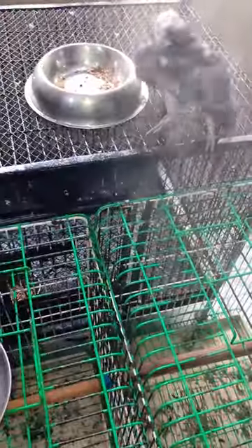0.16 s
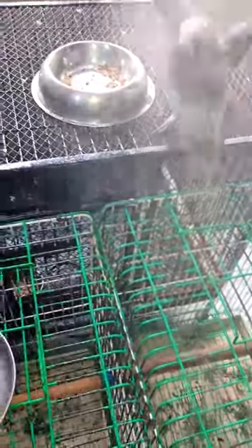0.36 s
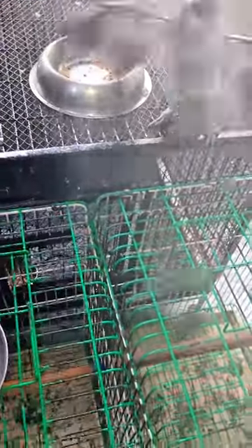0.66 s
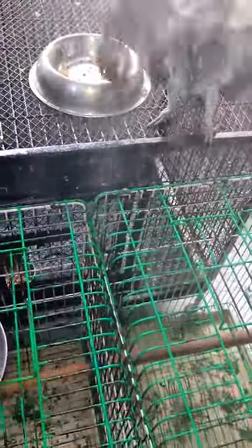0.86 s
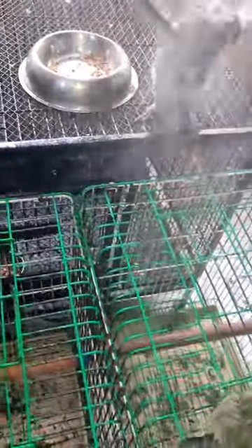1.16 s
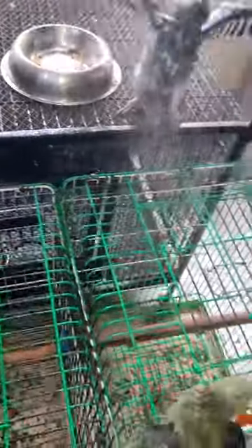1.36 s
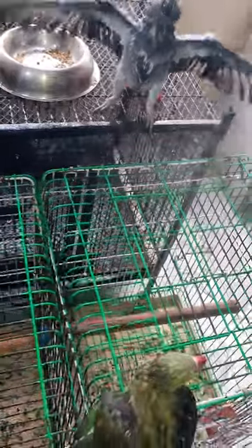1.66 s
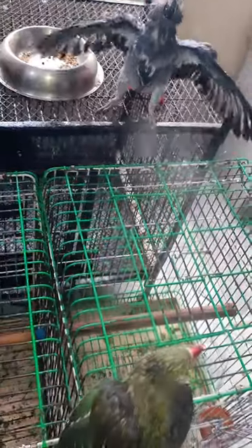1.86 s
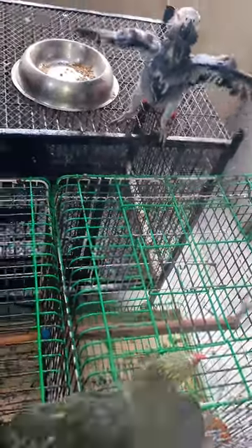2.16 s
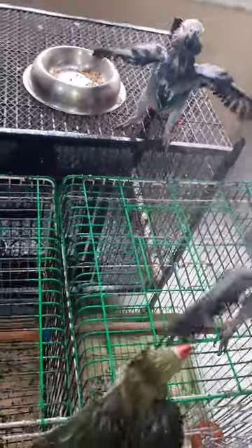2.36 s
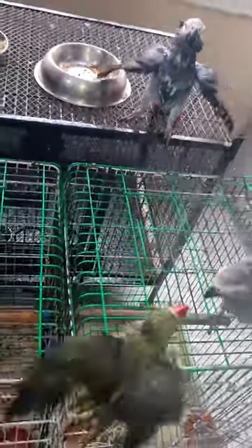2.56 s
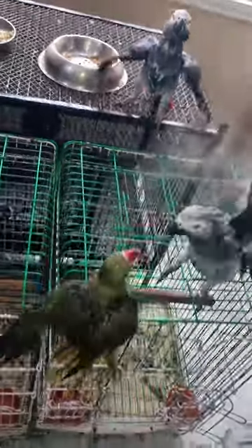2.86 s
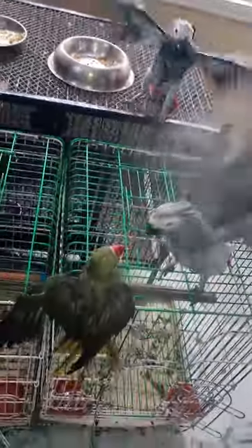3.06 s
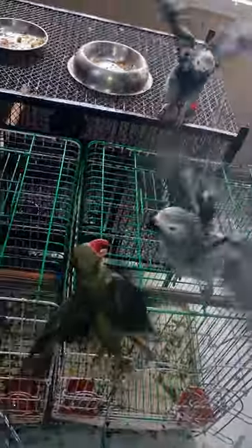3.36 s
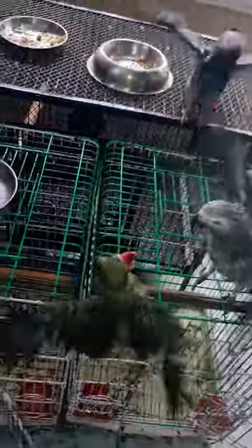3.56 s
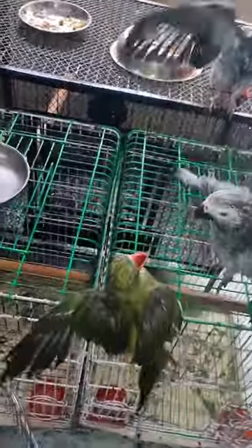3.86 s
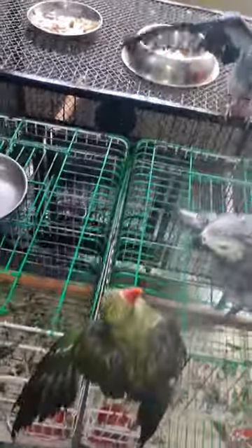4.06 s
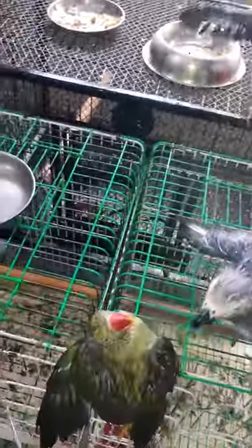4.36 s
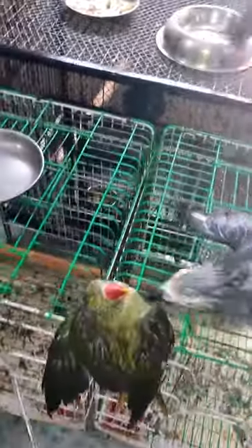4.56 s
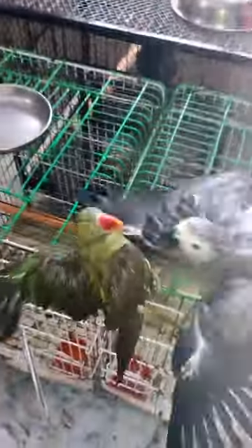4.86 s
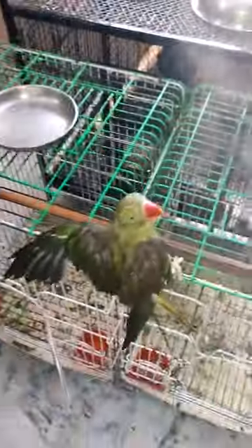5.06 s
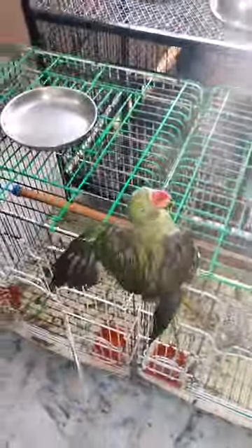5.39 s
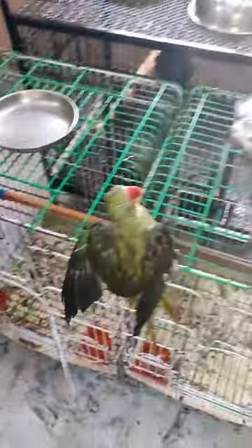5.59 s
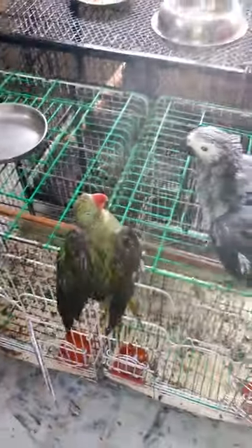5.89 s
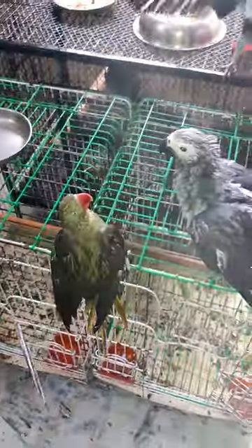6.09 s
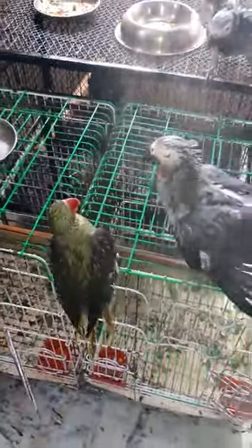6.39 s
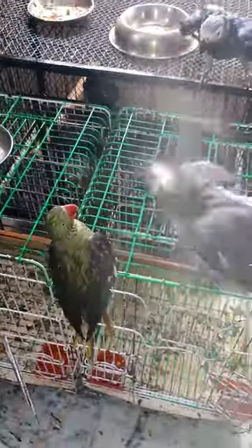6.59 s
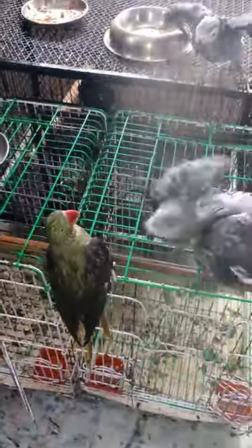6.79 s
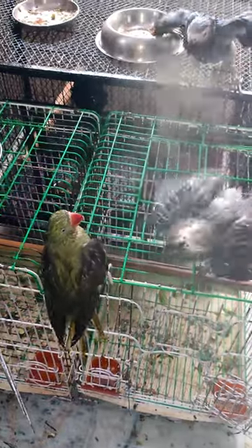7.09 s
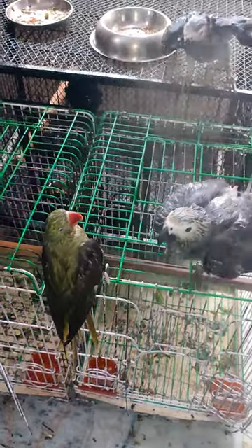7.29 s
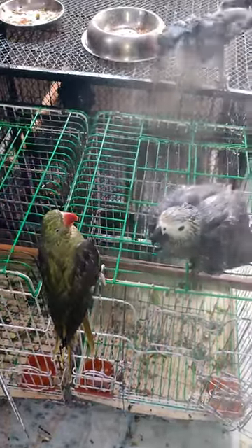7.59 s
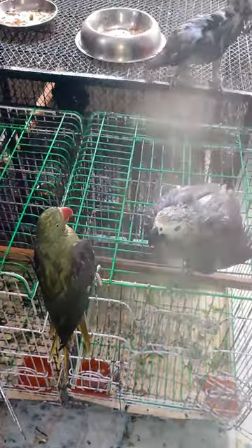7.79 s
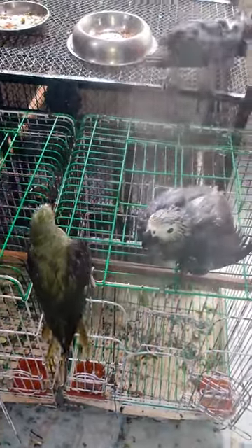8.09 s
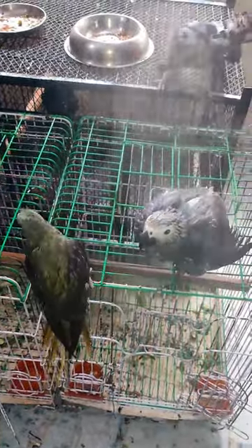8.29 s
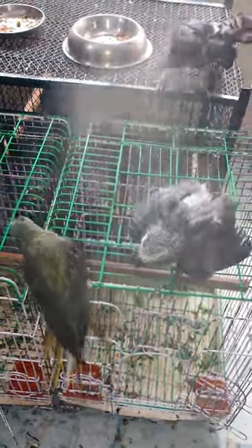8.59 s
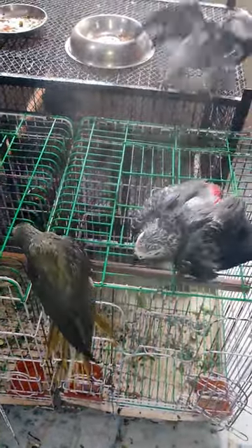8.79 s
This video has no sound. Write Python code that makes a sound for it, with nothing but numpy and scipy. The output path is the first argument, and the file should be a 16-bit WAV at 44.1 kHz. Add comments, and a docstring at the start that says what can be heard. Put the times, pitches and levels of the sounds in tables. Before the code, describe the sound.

Small parrots chirp and screech in quick flurries in a hard-walled room, while a fine water spray hisses and patters. One bird beats its wings for the first few seconds. Bigger parrots give short, harsh squawks and soft grumbles close by, and claws now and then clink on cage wire. Past the middle come a run of high tweets and two dry knocks, then the calls thin out over a low hum.

```python
"""A hard-walled room, where caged parrots are showered with a fine water mist. Small parrots chirp and
screech all around, in short flurries over a steady bustle, and big ones squawk and grumble close by:
each call is a vibrating membrane whose harmonics are filtered by throat and beak. One bird beats its
wings over the mesh, pushing air and swishing feathers; claws set the wires ringing. The nozzle hisses,
droplets patter, and two dry knocks sound over a low rumble and hum."""
import sys
import numpy as np
from scipy import signal
from scipy.fft import rfft, irfft
from scipy.io import wavfile
from scipy.ndimage import uniform_filter1d

SR = 44100
rng = np.random.default_rng(int(sys.argv[2]) if len(sys.argv) > 2 else 0)


def to_wav(sig):
    """Store sig (one row per channel, or 1-D mono) as 16-bit WAV at the path in sys.argv[1].

    Samples outside -1..1 are clipped; the rate is SR.
    """
    pcm = np.clip(np.atleast_2d(sig), -1, 1) * 32767
    pcm = np.round(pcm).astype(np.int16)
    wavfile.write(sys.argv[1], SR, pcm.T)  # frames by channels


N = 394254
TIME = np.arange(N) / SR

# Levels are relative, ahead of room and channel gains. Roughness is 0 for a clear voice, near 1 if harsh.
# clear chirps: t/s, length/s, start f/Hz, end f/Hz, level/dB, roughness
CHIRPS = [(0, 0.011, 4780, 4880, -18, 0.23), (0.026, 0.067, 6450, 5100, -22.5, 0.3),
          (2.834, .11, 4690, 5250, -21.5, 0.21), (3.066, 0.028, 3650, 3390, -30.5, .1),
          (3.107, 0.04, 5020, 4646, -22, 0.16), (3.289, 0.017, 4080, 4090, -34, 0.1),
          (3.324, 0.035, 5040, 5180, -21, .22), (3.487, 0.015, 4200, 4060, -25, 0),
          (3.513, 0.0645, 4650, 4910, -22, 0.3), (3.567, .059, 3270, 3420, -23, 0.19),
          (4.015, 0.029, 3340, 3360, -29.5, 0.3), (4.613, 0.03, 4460, 5040, -23.5, 0.28),
          (6.055, 0.039, 4460, 4800, -29.5, 0.5), (6.682, 0.073, 2928, 2823, -35.5, 0.15),
          (7.313, 0.038, 3420, 3110, -31, 0.15), (7.759, 0.075, 2804, 3880, -28.5, 0.18),
          (7.945, 0.033, 3360, 2950, -25.5, 0.13), (8.051, 0.078, 4780, 5180, -36.5, 0.3),
          (8.59, 0.079, 4680, 5090, -34, 0.24)]
# screeches: t/s, length/s, start f/Hz, middle f/Hz, end f/Hz, beak f/Hz, lift/dB, level/dB, roughness
SCREECHES = [(0.273, 0.1, 2544, 2510, 2360, 5000, 25, -22, 0.7),
             (0.464, 0.069, 2260, 2380, 2310, 4320, 25, -28.5, 1.46),
             (0.632, 0.069, 2097, 2263, 2430, 4300, 36, -24.5, 1.03),
             (0.767, 0.081, 1376, 1408, 1413, 4230, 9, -32.5, 0.3),
             (0.891, 0.067, 1438, 1450, 1420, 5850, 15, -28.5, 0.3),
             (0.982, 0.1, 1403, 1385, 1340, 4200, 12, -32.5, 0.16),
             (1.12, 0.13, 2680, 2800, 2740, 5400, 6, -28, 0.37),
             (1.324, 0.061, 2218, 2105, 2004, 4170, 22, -23.5, 0.37),
             (1.397, 0.11, 1974, 1879, 2097, 3800, 25.5, -22, 0.4),
             (1.665, 0.16, 2293, 2467, 2446, 4870, 18, -29, 0.72),
             (1.787, 0.08, 2484, 2550, 2490, 5070, 16, -26, 0.7),
             (1.933, 0.094, 2527, 2630, 2563, 5150, 21, -27.5, 0.2),
             (2.333, 0.11, 2380, 2568, 2537, 4700, 18.5, -23.5, 0.55),
             (2.552, 0.11, 1877, 2106, 1920, 3900, 18, -28.5, 0),
             (2.724, 0.14, 1956, 2120, 1870, 6370, 24, -21.5, 0.2),
             (3.027, 0.11, 1920, 2184, 1950, 6300, 29, -30.5, 0.16),
             (3.67, 0.087, 1790, 2262, 2504, 4280, 26, -21, 0.5),
             (3.778, 0.062, 1650, 1972, 2155, 3700, 40, -19.5, 0.5),
             (3.899, 0.062, 1764, 2115, 2250, 4030, 37, -21.5, 0.49),
             (4.293, 0.033, 1780, 1943, 2100, 4020, 20, -31, 0.56),
             (4.512, 0.033, 2005, 1804, 1725, 1840, -1, -28.5, 0.18),
             (4.55, .11, 1876, 2066, 2050, 5840, 25, -26.5, 0.19),
             (5.553, 0.094, 2305, 2182, 2134, 6500, 20, -26, 0.39),
             (5.62, 0.033, 2720, 2650, 2550, 5440, 27, -20.5, 0.16),
             (6.302, 0.12, 1966, 2060, 2115, 2100, 8, -42.5, 0.5),
             (7.085, 0.081, 1846, 2130, 2305, 4600, 11, -28, 0.22),
             (7.139, 0.076, 2020, 2030, 1970, 6100, 28, -23, 0.06),
             (7.534, 0.054, 1780, 1964, 1720, 6000, -8, -34, 0.83),
             (7.853, 0.063, 1862, 2018, 2007, 3900, 14.5, -24, 0.37)]
# two-step tweets: t/s, high note f/Hz, low note level/dB, high note level/dB, octave level/dB, roughness
TWEETS = [(4.2, 5950, -41, -39.5, -65, 0.4), (4.313, 5540, -38, -36, -67, .3),
          (4.431, 5480, -25, -38, -65, 0.14), (4.786, 5480, -25, -31.5, -64, 0.08),
          (5.739, 5810, -20.5, -34, -30, 0.64), (5.842, 5680, -28.5, -34, -31.5, 0.3),
          (5.96, 5910, -25.5, -36, -31, 0), (6.08, 5820, -39, -35.5, -33, 0.3),
          (6.206, 5630, -27, -36, -35.5, 0.65), (6.317, 5490, -23, -27, -32.5, 0.54),
          (6.434, 5330, -31, -42, -38.5, 0.46), (6.556, 5440, -26, -33.5, -36.5, 0.43)]
# tiny pips close by: t/s, length/s, f/Hz, level/dB
PIPS = [(4.664, 0.011, 3650, -23), (4.7815, .015, 3376, -24.5), (7.7046, .004, 4700, -22),
        (7.705, .006, 10100, -36), (7.726, .004, 4600, -17)]
# squawks: t/s, length/s, start f/Hz, end f/Hz, throat start f/Hz, throat end f/Hz, level/dB, roughness
SQUAWKS = [(0.785, 0.067, 472, 516, 890, 1000, -34, 0.92), (0.946, 0.08, 529, 578, 1100, 1210, -36, 0.89),
           (1.205, 0.028, 640, 660, 2600, 2600, -25, 0.87), (1.224, 0.04, 625, 664, 2730, 2660, -15, 1.04),
           (1.263, .045, 642, 686, 2780, 2700, -22, 0.93), (2.274, 0.026, 895, 726, 1730, 1450, -28, 0.66),
           (2.404, 0.015, 928, 803, 1290, 1600, -25, 0.66),
           (3.203, 0.097, 556, 620, 1650, 2200, -29.5, 0.9), (3.3, 0.099, 605, 682, 1340, 1770, -27, 0.77),
           (3.359, 0.04, 986, 726, 1010, 1400, -31.5, 0.45),
           (3.388, 0.042, 783, 1006, 1650, 2030, -14, 0.65), (3.42, 0.029, 903, 933, 2100, 2730, -15, 0.78),
           (3.463, 0.046, 874, 878, 2160, 2540, -25, 0.79), (4.833, 0.045, 699, 960, 970, 1220, -24, 0.77),
           (4.862, 0.045, 940, 1192, 1060, 1390, -25, 0.6),
           (4.871, 0.05, 572.4, 595, 1710, 2010, -19, 0.56),
           (4.885, 0.042, 555.5, 646, 3040, 3700, -19, 0.5),
           (4.925, 0.029, 598, 613, 2200, 2500, -23, 0.46), (5.094, 0.036, 804, 885, 1080, 1220, -26, 0.42),
           (5.14, 0.014, 889, 901, 1800, 1840, -20.5, 0.48),
           (5.163, 0.0064, 862, 826, 1770, 1970, -26, 0.8),
           (5.426, 0.028, 583, 611, 2410, 2570, -20.5, 0.68),
           (5.523, 0.031, 601, 617, 2550, 2500, -22, 0.54), (5.827, 0.063, 663, 438, 2550, 2420, -27, 0.87)]
# soft grumbles: t/s, length/s, start f/Hz, middle f/Hz, end f/Hz, level/dB
GRUMBLES = [(3.286, .085, 720, 590, 700, -36), (4.452, .042, 392, 386, 382, -46),
            (4.608, .118, 382, 446, 500, -41), (5.822, .112, 700, 535, 368, -41),
            (7.564, .112, 700, 510, 345, -41.5), (8.89, .06, 520, 560, 600, -46)]
# throat responses of a screech and a grumble: f/Hz, gain/dB
SMALL_THROAT = [(1400, -3), (2100, 8), (3000, 3.5), (4200, 2), (6200, -1.5), (8300, -5), (10200, -12),
                (12400, -9.5), (15000, -52)]
GRUMBLE_THROAT = [(300, -4.5), (650, -13), (1100, -13), (2000, -25), (4000, -56), (8000, -20.5)]
# a big parrot's upper resonances, which open as its voice roughens: f/Hz, relative width, gain/dB
UPPER_FORMANTS = [(3350, .1, -7), (5300, .12, -13)]
# steady bustle between flurries: t/s, chatter level/dB, spray level/dB
BUSTLE = [(0.0, -25, -27.5), (1.29, -35, -25), (3.36, -29.5, -39), (3.83, -25, -24.5), (4.16, -36, -44),
          (4.83, -21.5, -45), (5.1, -40, -39), (5.35, -67, -50), (5.65, -36, -29), (6.52, -37, -49),
          (6.8, -78, -90), (7.07, -65, -30), (7.22, -35, -49), (7.97, -26, -32.5), (8.46, -43.5, -52.5),
          (8.94, -51, -60)]
# flurries, as birds shriek and shake their feathers in the spray: t/s, length/s, level/dB, brightness/dB
FLURRIES = [(0, 0.2, -30.5, -4), (0.263, 0.14, -28.5, -1), (0.462, 0.093, -29, -0.5),
            (0.614, 0.032, -27, 3), (1.217, 0.051, -20, -7.5), (1.428, 0.1, -27, -4.5), (1.65, 0.3, -34, 3),
            (1.995, 0.22, -31, -3), (2.294, 0.18, -30.5, -1), (2.582, 0.06, -29, -1.5),
            (2.805, 0.082, -33.5, 8), (3.017, 0.072, -29.5, -3.5), (3.266, 0.15, -28.5, -4),
            (3.489, 0.035, -29, -2), (3.68, 0.11, -34.5, 4.5), (4.03, 0.011, -32, 3.5),
            (4.43, 0.032, -36, -5.5), (4.53, 0.14, -28.5, -4.5), (5.289, 0.094, -37.5, -3),
            (5.441, 0.043, -30.5, -3.5), (5.544, 0.048, -27, -2), (5.958, 0.019, -40, 6),
            (6.174, 0.078, -38.5, 0.5), (6.42, 0.059, -34.5, -9.5), (6.55, 0.14, -38, -5),
            (7.087, 0.2, -44, 5.5), (7.396, 0.11, -39, -5.5), (7.538, 0.086, -34, -5.5),
            (7.703, 0.089, -30, -4), (7.837, 0.047, -35.5, 3.5), (8.168, 0.17, -44.5, 3),
            (8.552, 0.11, -40, -4), (8.799, 0.078, -41.5, -0.5)]
# wing beats, about seven a second at full effort: t/s, air push level/dB, feather swish level/dB
WINGBEATS = [(.35, -56, -38.5), (.465, -56, -43.5), (.655, -58, -40.5), (.83, -37.5, -44), (.985, -37, -44),
             (1.135, -35, -35), (1.28, -41, -36), (1.58, -38, -51), (1.725, -33.5, -47),
             (1.865, -35.5, -46), (2.005, -34.5, -60), (2.144, -36, -61), (2.282, -35, -45),
             (2.42, -37, -41), (2.56, -37, -40), (2.705, -37.5, -49), (2.85, -55, -49)]
# spectra of the air puff, the feather swish and the spray: f/Hz, level/dB
PUFF_SPECTRUM = [(20, -6), (70, 0), (130, 3.5), (175, -3), (210, 9), (280, -6), (700, -3.5), (1500, -54)]
SWISH_SPECTRUM = [(150, 3), (500, 9), (900, 11), (1300, 4.5), (1800, 6.5), (4000, 8), (12000, -40)]
MIST_SPECTRUM = [(200, -40), (700, -44), (1500, -25), (2300, -4.5), (4200, 1.5), (6500, -1), (8500, -12),
                 (10000, -14), (12500, -3), (14300, -23.5)]
# claws and beaks striking the wire: t/s, level/dB
WIRE_STRIKES = [(0.635, -30), (2.853, -21), (4.042, -27), (5.019, -29.5), (5.3, -32), (7.393, -30.5),
                (7.704, -35)]
# modes of the cage wire: f/Hz, level/dB, T60/s
WIRE_MODES = [(2220, 3, 0.022), (3650, 13, 0.03), (4300, -5, 0.029), (5020, 13.5, 0.018), (6640, -2, .055),
              (7240, 3, 0.022), (9030, 1, .025)]
# small knocks close by: t/s, level/dB
KNOCKS = [(5.515, -11.5), (6.09, -9)]
# low background: t/s, rumble level/dB, hum f/Hz, hum level/dB
BACKGROUND = [(0, -46, 150, -48.5), (.8, -48.5, 140, -51.5), (1.1, -43, 135, -67), (1.35, -45, 140, -54),
              (2.25, -41.5, 135, -49), (2.42, -45.5, 161, -39.5), (2.8, -42, 162, -48.5),
              (3.2, -48, 160, -56), (4, -50.5, 150, -85), (7.3, -53, 140, -77), (8.1, -53.5, 133, -54),
              (8.35, -50, 125, -52.5), (8.94, -49, 116, -52.5)]
# spectra of the rumble and the room's hush: f/Hz, level/dB
RUMBLE_SPECTRUM = [(20, -1), (40, -8.5), (70, -6.5), (130, -9.5), (250, -9.5), (500, -18), (1000, -40),
                   (3000, -34.5)]
HUSH_SPECTRUM = [(30, 29.5), (150, -16), (400, 22), (1000, 21.5), (2000, 24.5), (5000, 1), (10000, -35),
                 (14500, -41)]
# reverberation time of the room: f/Hz, T60/s
ROOM_T60 = [(200, 0.54), (1000, 0.44), (2500, 0.47), (5000, 0.39), (9000, 0.44), (14000, 0.26)]

CUTOFF_HZ = 14350
CHATTER_DB, RASP_DB, SPRAY_DB = -10, -16, -6   # shares of the bustle
FLURRY_CHIRP_DB, FLURRY_RASP_DB, FLURRY_RUSTLE_DB = -3.5, -11.5, -21.5   # shares of a flurry


def syrinx(t, pitch, throat_db, jitter, jitter_rate, shimmer_db, count):
    """Source and filter: the harmonics of an unsteady membrane are weighted by the throat; rms 1."""
    phase = phase_of(pitch * (1 + jitter * wander(t, jitter_rate)))
    k = np.arange(1, count + 1)[:, None]
    harmonics = from_db(throat_db(k * pitch)) * (k * pitch < CUTOFF_HZ) * np.sin(k * phase)
    swell = np.abs(np.sin(np.pi * t / t[-1])) ** .35
    shimmer = from_db(shimmer_db * wander(t, jitter_rate / 2))
    return rms_one(harmonics.sum(axis=0) * swell * shimmer)


def chirp(length, start_hz, middle_hz, end_hz, rough):
    """Random modulation: roughness spreads a nearly pure tone into a rasp."""
    t, pitch = glide(length, start_hz, middle_hz, end_hz)
    return syrinx(t, pitch, lambda hz: -14.5 * np.log2(hz / pitch),
                  jitter=.008 + .12 * rough, jitter_rate=1000, shimmer_db=1.5 + 6 * rough, count=3)


def screech(length, start_hz, middle_hz, end_hz, beak_hz, lift_db, rough):
    """Resonance: the beak weights a raspy voice's partials near its own frequency and an octave above."""
    t, pitch = glide(length, start_hz, middle_hz, end_hz)
    pitch = pitch * np.exp(.035 * rough * wander(t, 150))

    def throat_db(hz):
        beak = resonance(hz, beak_hz, width=.23) + .85 * resonance(hz, 2 * beak_hz, width=.23)
        return at_hz(SMALL_THROAT, hz) + lift_db * beak
    return syrinx(t, pitch, throat_db,
                  jitter=.005 + .063 * rough, jitter_rate=1400, shimmer_db=2 + 3 * rough, count=9)


def small_parrots():
    """Superposition: the gliding chirps and screeches of the nearest small birds add up."""
    out = np.zeros(N)
    arch = .02055   # upward bow of a chirp, as a share of its pitch
    for s, length, start_hz, end_hz, db, rough in CHIRPS:
        middle_hz = (1 + arch) * (start_hz + end_hz) / 2
        add(out, s, from_db(db) * chirp(length, start_hz, middle_hz, end_hz, rough))
    for s, *shape, db, rough in SCREECHES:
        add(out, s, from_db(db) * screech(*shape, rough))
    return out


def tweets():
    """Frequency jump: after a buzzy upsweep, a low note flicks up to a hooked high one and its octave."""
    out = np.zeros(N)
    for s, high_hz, low_db, high_db, octave_db, rough in TWEETS:
        low_hz = .61 * high_hz
        upsweep = screech(.022, .45 * low_hz, .52 * low_hz, .62 * low_hz, low_hz, 0, rough)
        add(out, s - .02, from_db(low_db - 13) * upsweep)
        low_note = chirp(.017, low_hz, low_hz, (1 + .3 * rough) * low_hz, rough / 2)
        add(out, s, from_db(low_db) * low_note)
        t, pitch = glide(.028, .95 * high_hz, 1.01 * high_hz, .99 * high_hz)
        phase = phase_of(pitch * (1 + .05 * rough * wander(t, 900)))
        high_note = from_db(high_db) * np.sin(phase) + from_db(octave_db) * np.sin(2 * phase)
        add(out, s + .015, 2 * high_note * np.sin(np.pi * t / t[-1]))
    return out


def pips():
    """Tone bursts: nearly pure notes of level pitch, a few milliseconds long."""
    out = np.zeros(N)
    for s, length, hz, db in PIPS:
        add(out, s, from_db(db) * chirp(length, hz, hz, hz, rough=0))
    return out


def squawk(length, start_hz, end_hz, throat_start_hz, throat_end_hz, rough):
    """Subharmonics: a fluttering voice breaks into a rattle at a third of its pitch; the throat slides."""
    t, pitch = glide(length, start_hz, (start_hz + end_hz) / 2, end_hz)
    pitch = pitch * np.exp(.1134 * rough * wander(t, 141.1))
    throat_hz = np.linspace(throat_start_hz, throat_end_hz, len(t))

    def throat_db(hz):
        upper = sum(from_db(db) * resonance(hz, centre, width) for centre, width, db in UPPER_FORMANTS)
        return 20 * np.log10(resonance(hz, throat_hz, width=.29) + rough ** 2 * upper)
    voice = syrinx(t, pitch, throat_db,
                   jitter=.065 * rough, jitter_rate=700, shimmer_db=3 * rough, count=12)
    rattle = syrinx(t, pitch / 3, throat_db, jitter=.2, jitter_rate=900, shimmer_db=3, count=42)
    hoarse = np.clip(rough, 0, 1) ** 3
    blend = np.sqrt(1 - hoarse) * voice + np.sqrt(hoarse) * rattle
    call = np.tanh(blend * rough * .7)   # the driven membrane saturates, which keeps the squawk dense
    band_pass = signal.butter(3, [665, 7040], "band", fs=SR, output="sos")
    return rms_one(signal.sosfilt(band_pass, call))


def big_parrots():
    """Harmonic series on low fundamentals: harsh squawks and soft, gliding grumbles."""
    out = np.zeros(N)
    for s, *shape, db, rough in SQUAWKS:
        add(out, s, from_db(db) * squawk(*shape, rough))
    for s, *shape, db in GRUMBLES:
        t, pitch = glide(*shape)
        grumble = syrinx(t, pitch, lambda hz: at_hz(GRUMBLE_THROAT, hz),
                         jitter=.025, jitter_rate=500, shimmer_db=2, count=8)
        add(out, s, from_db(db) * grumble)
    return out


def chatter(low_hz, high_hz, least_rough, count):
    """Incoherent sum: many overlapping chirps, clear to raspy, held at an even overall level."""
    out = np.zeros(N)
    spread_db = 34
    for k, (when, size, height, bend, rasp, loud) in enumerate(rng.random((count, 6))):
        hz = low_hz * (high_hz / low_hz) ** height
        rough = least_rough + .372 * rasp
        call = chirp(.04 + .07 * size, hz * (.9 + .14 * bend), hz, hz * (1.04 - .07 * bend), rough)
        add(out, (k + when) / count * N / SR - .05, from_db(spread_db * loud) * call)
    power = uniform_filter1d(out ** 2, int(.051 * SR))
    return out / np.sqrt(power + 1e-6)


def flock(high, low, treble):
    """Superposition in three registers: the further birds chirp high, rasp lower and squeak above both."""
    chirping = high * chatter(3700, 6300, least_rough=.077, count=300)
    rasping = low * chatter(2300, 3050, least_rough=.31, count=340)
    squeaking = treble * from_db(-5.5) * chatter(7200, 8900, least_rough=.063, count=170)
    return chirping + rasping + squeaking


def flurries():
    """Amplitude modulation: bass, middle and treble envelopes rise, hold and decay in uneven shakes."""
    out = np.zeros((3, N))
    attack_s, release_s = .0023, .025
    for s, length, db, bright_db in FLURRIES:
        t = np.arange(int((length + 8 * release_s) * SR)) / SR
        envelope = np.minimum(t / attack_s, 1) * np.exp(-np.maximum(t - length, 0) / release_s)
        for track, tilt in zip(out, (-1, 0, 1)):
            add(track, s, from_db(db + tilt * bright_db) * envelope)
    return out * from_db(4 * wander(TIME, 70))


def wings(rustle):
    """Air displacement: each downstroke sends a pressure dip, a turbulent puff and a feather swish."""
    push_s, rise_s, puff_db = .012, .028, -7
    push, puff, swish = np.zeros(N), np.zeros(N), rustle.copy()
    t = np.arange(SR // 3) / SR
    stroke = (t / rise_s) ** 2 * np.exp(2 - 2 * t / rise_s)
    u = ((t - t.mean()) / push_s) ** 2
    pressure_dip = (2 * u - 1) * np.exp(-u)
    for s, air_db, swish_db in WINGBEATS:
        add(push, s - t.mean(), from_db(air_db) * pressure_dip)
        add(puff, s - rise_s / 2, from_db(air_db + puff_db) * stroke)
        add(swish, s - rise_s, from_db(swish_db) * stroke)
    flutter = from_db(3 * wander(TIME, 200))
    air = push + puff * colour(rng.standard_normal(N), PUFF_SPECTRUM)
    feathers = swish * flutter * colour(rng.standard_normal(N), SWISH_SPECTRUM)
    return air, feathers


def mist(strength):
    """Broadband and shot noise: the nozzle hisses, droplets hit wire and feathers; each band flickers."""
    drops_per_s, band_hz, flicker_db = 900, 700, 4.5
    drops = (rng.random(N) < drops_per_s / SR) * rng.standard_normal(N)
    drops *= from_db(.98 * rng.exponential(1, N).clip(0, 4))
    hiss = rng.standard_normal(N) * from_db(2 * wander(TIME, 60))
    spectrum = rfft(hiss + 1.24 * rms_one(drops))
    band = np.fft.rfftfreq(N, 1 / SR) // band_hz
    spray = np.zeros(N)
    for k in range(CUTOFF_HZ // band_hz + 1):
        flicker = from_db(flicker_db * wander(TIME + rng.random(), 13))
        spray += irfft(spectrum * (band == k), N) * flicker
    return strength * from_db(1.5) * colour(spray, MIST_SPECTRUM)


def cage():
    """Damped modes: a claw or beak catches and slips three times, setting the wires ringing."""
    out, t = np.zeros(N), np.arange(SR // 6) / SR
    hz, mode_db, t60 = np.transpose(WIRE_MODES)[:, :, None]
    for s, db in WIRE_STRIKES:
        delays = np.r_[0, np.cumsum(rng.uniform(.003, .012, 3))]
        for slip, delay in enumerate(delays):
            strength = from_db(mode_db + 4 * rng.standard_normal(hz.shape) - 60 * t / t60)
            ring = np.sum(strength * np.sin(2 * np.pi * hz * t), axis=0)
            scratch = 2 * rng.standard_normal(len(t)) * np.exp(-t / .0035)
            add(out, s + delay, from_db(db - 9 - 4 * slip) * (ring + scratch))
    return out


def knocks():
    """Heavy damping: dull, dry taps close on the right die out within one cycle."""
    out, t = np.zeros(N), np.arange(SR // 50) / SR
    for s, db in KNOCKS:
        add(out, s, from_db(db) * np.exp(-t / .00011) * np.cos(2 * np.pi * 600 * t))
    return out * balance(-12, 1.5)


def background():
    """Ambient noise: a wavering hum, a low rumble alike on both sides and the room's diffuse hush."""
    rumble_db, hum_hz, hum_db = in_time(BACKGROUND)
    hum = np.sin(phase_of(hum_hz * (1 + .0242 * wander(TIME, 30))))
    rumble = colour(rng.standard_normal(N) + .32 * rng.standard_normal((2, N)), RUMBLE_SPECTRUM)
    hush = colour(rng.standard_normal(N) + 6.4 * rng.standard_normal((2, N)), HUSH_SPECTRUM)
    hum *= from_db(hum_db + 1.2 * wander(TIME, 11))
    return hum + from_db(rumble_db) * rumble + from_db(-50.5) * hush


def room(x, wet_db, left_lag_ms):
    """Reverberation: a diffuse tail, coherent between the sides only in the bass, follows direct sound."""
    t = np.arange(int(.7 * SR)) / SR
    edges_hz = np.geomspace(60, 18000, 10)
    freqs, tail = np.fft.rfftfreq(len(t), 1 / SR), 0
    coherence = 1 / (1 + (freqs / 600) ** 2)
    noise = np.sqrt(coherence) * rfft(rng.standard_normal(len(t)))
    noise = noise + np.sqrt(1 - coherence) * rfft(rng.standard_normal((2, len(t))))
    for low, high in zip(edges_hz, edges_hz[1:]):
        t60 = at_hz(ROOM_T60, np.sqrt(low * high))
        decay = from_db(-60 * t / t60) * (1 - np.exp(-t / .002))
        band = irfft(noise * ((freqs >= low) & (freqs < high)), len(t))
        tail = tail + band * decay / np.linalg.norm(decay)
    lag_s = round(left_lag_ms * SR / 1000) / SR
    direct = np.array([np.interp(TIME - lag_s, TIME, x), x])
    reverberant = signal.fftconvolve(x[None], tail, axes=1)[:, :N]
    wet = from_db(wet_db)
    return (direct + wet * reverberant) / np.sqrt(1 + wet ** 2)


def glide(length, start_hz, middle_hz, end_hz):
    """Time, and a parabola of pitch through three points."""
    t = np.arange(int(max(length, .005) * SR)) / SR
    return t, np.polyval(np.polyfit([0, .5, 1], [start_hz, middle_hz, end_hz], 2), t / t[-1])


def resonance(hz, centre_hz, width):
    """A resonance curve of height 1; width is a share of its frequency."""
    return 1 / (1 + (np.log(hz / centre_hz) / width) ** 2)


def wander(t, rate):
    """Random fluctuation of spread about 1, with a new value rate times a second."""
    knots = rng.standard_normal(256 if len(t) < SR else 65536)
    return np.interp(t * rate, np.arange(len(knots)), knots)


def colour(x, spectrum):
    """Filtering by a spectrum; rms 1."""
    gain = from_db(at_hz(spectrum, np.fft.rfftfreq(N, 1 / SR)))
    return rms_one(irfft(rfft(x) * gain, N))


def at_hz(points, hz):
    """Interpolation on a log-frequency axis."""
    f, value = np.transpose(points)
    return np.interp(np.log(np.maximum(hz, 1)), np.log(f), value)


def in_time(rows):
    """Linear interpolation of each column over time."""
    s, *columns = np.transpose(rows)
    return [np.interp(TIME, s, column) for column in columns]


def add(track, s, sound):
    """Superposes a sound on a track at time s."""
    start = int(np.clip(s * SR, 0, N))
    track[start:start + len(sound)] += sound[:N - start]


def phase_of(hz):
    return 2 * np.pi * np.cumsum(hz) / SR


def from_db(db):
    return 10 ** (np.asarray(db) / 20)


def rms_one(x):
    return x / np.sqrt(np.mean(x ** 2) + 1e-20)


def balance(left_db, right_db):
    return from_db([[left_db], [right_db]])


def scene():
    """Flurries and bustle add in power; all but the wings' air, knocks and background reverberates."""
    chatter_db, hiss_db = in_time(BUSTLE)
    bass, middle, top = flurries()
    high = np.hypot(from_db(chatter_db + CHATTER_DB), from_db(FLURRY_CHIRP_DB) * middle)
    low = np.hypot(from_db(chatter_db + RASP_DB), from_db(FLURRY_RASP_DB) * bass)
    treble = np.hypot(from_db(hiss_db + SPRAY_DB), top)
    air, feathers = wings(rustle=from_db(FLURRY_RUSTLE_DB) * middle)
    near = room(big_parrots() + feathers + cage(), wet_db=.5, left_lag_ms=-.17) * balance(-.4, .4)
    calls = room(small_parrots(), wet_db=5.5, left_lag_ms=-.47) * balance(-1.2, -.6)
    calls += room(tweets(), wet_db=1.5, left_lag_ms=-.53) * balance(.8, -2)
    calls += room(pips(), wet_db=-7, left_lag_ms=-.57)
    crowd = room(flock(high, low, treble), wet_db=-1, left_lag_ms=-.45) * balance(-.5, .5)
    spray = room(mist(treble), wet_db=4.5, left_lag_ms=.05)
    return near + calls + crowd + spray + air + knocks() + background()


def record(dry):
    """Frequency response: the treble is lifted slightly on the left, notched on the right, then cut."""
    freqs = np.fft.rfftfreq(N, 1 / SR)
    left_db = at_hz([(7000, 0), (8500, 2), (10000, 0), (12500, 1.2)], freqs)
    right_db = at_hz([(7300, 0), (8600, -12), (9900, -1.5), (12500, -2.2)], freqs)
    low_pass = 1 / np.sqrt(1 + (freqs / CUTOFF_HZ) ** 400)
    return irfft(rfft(dry) * from_db([left_db, right_db]) * low_pass, N)


dry = scene()
out = record(dry)
to_wav(out)
```